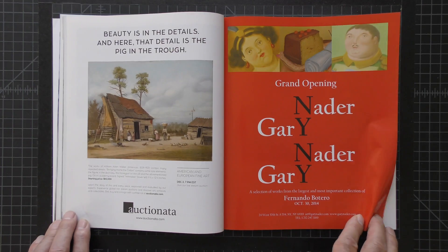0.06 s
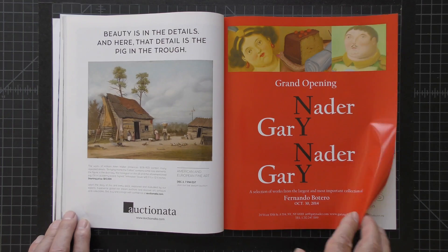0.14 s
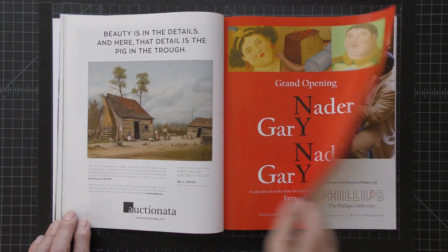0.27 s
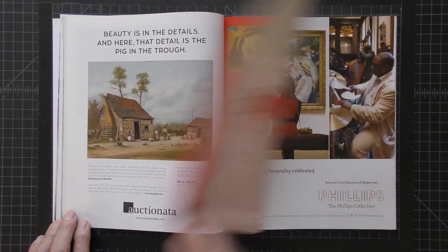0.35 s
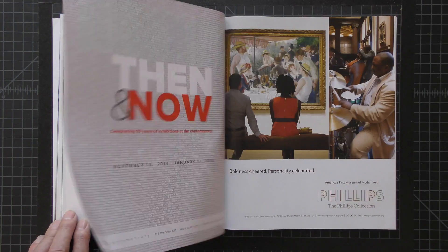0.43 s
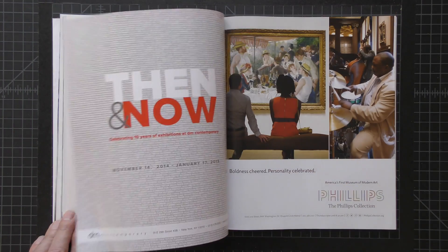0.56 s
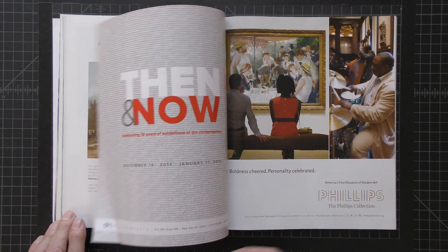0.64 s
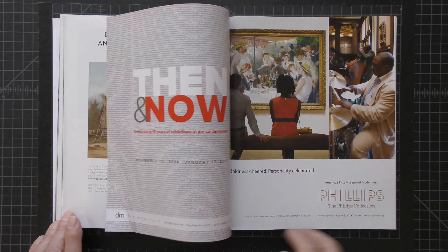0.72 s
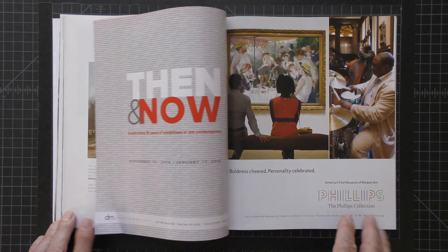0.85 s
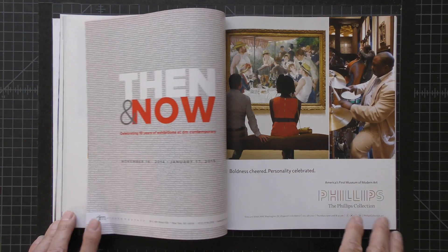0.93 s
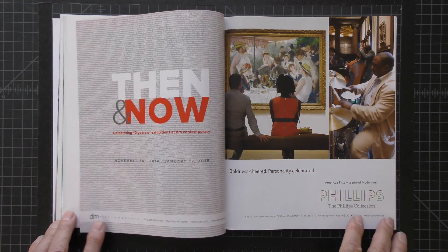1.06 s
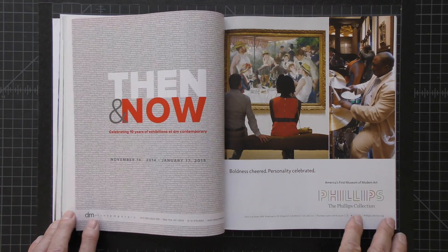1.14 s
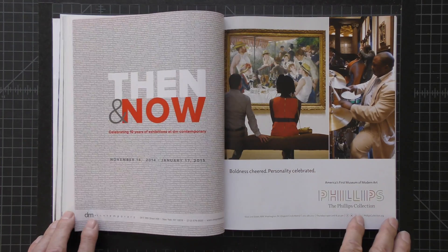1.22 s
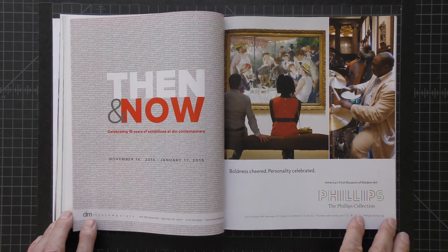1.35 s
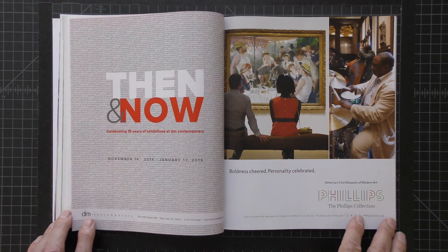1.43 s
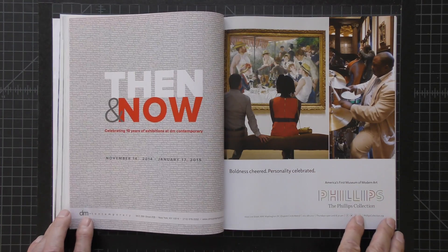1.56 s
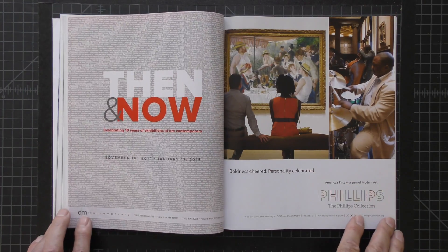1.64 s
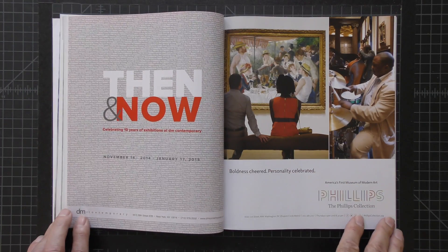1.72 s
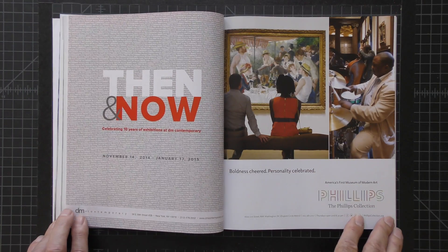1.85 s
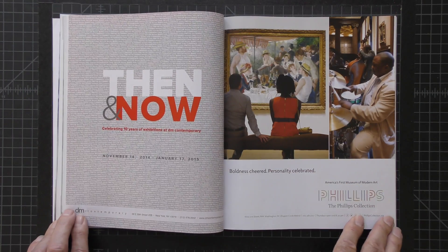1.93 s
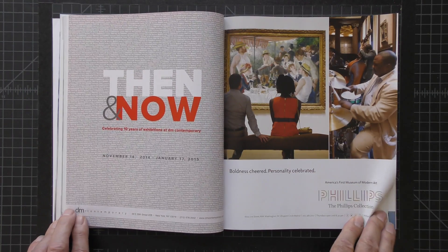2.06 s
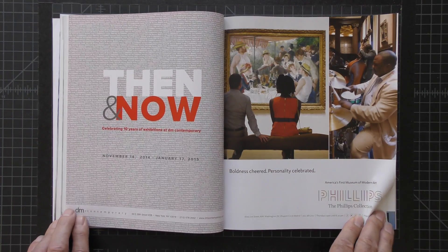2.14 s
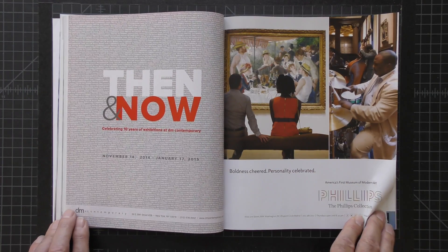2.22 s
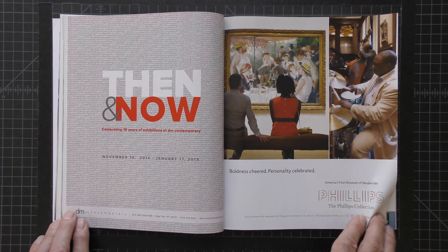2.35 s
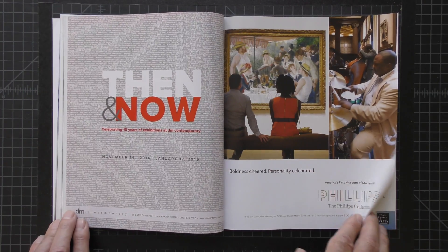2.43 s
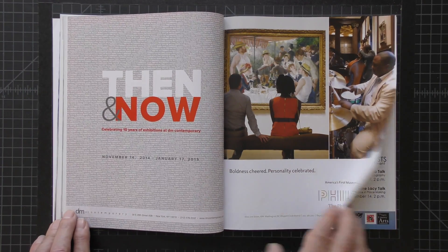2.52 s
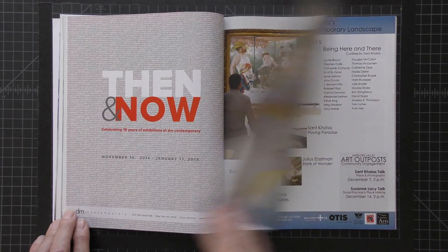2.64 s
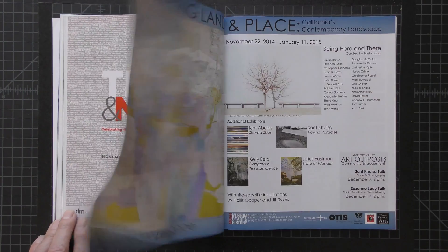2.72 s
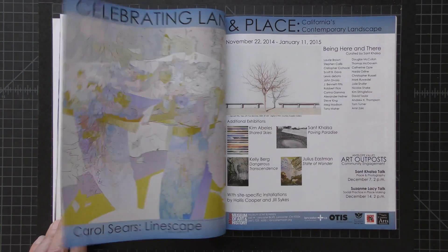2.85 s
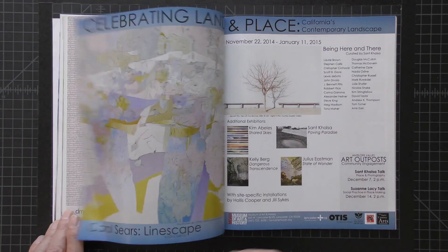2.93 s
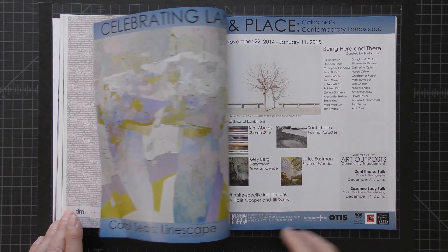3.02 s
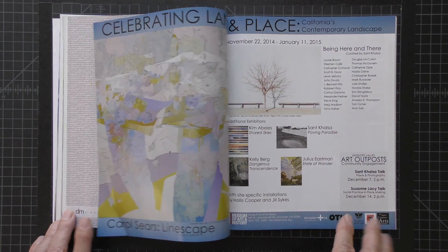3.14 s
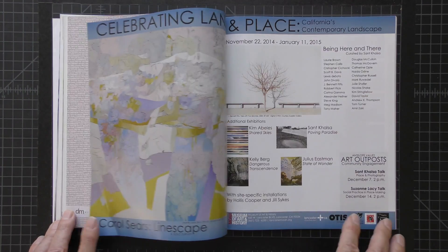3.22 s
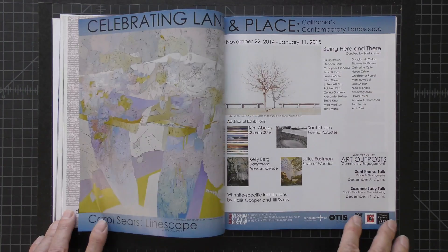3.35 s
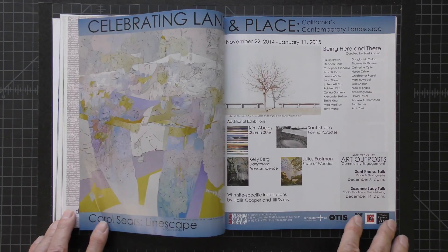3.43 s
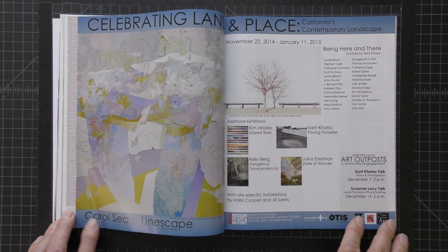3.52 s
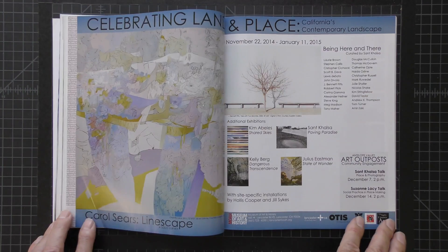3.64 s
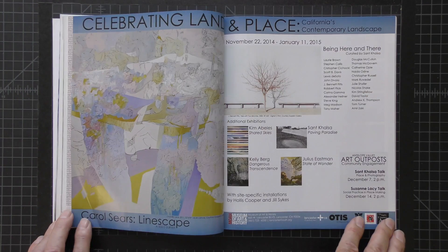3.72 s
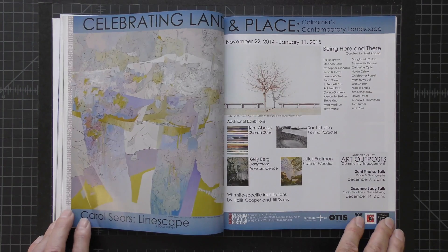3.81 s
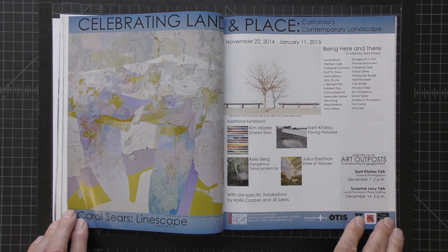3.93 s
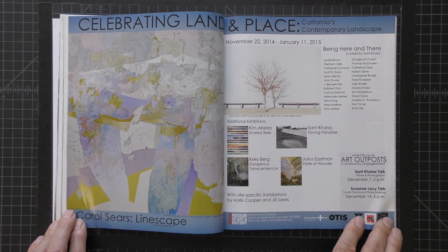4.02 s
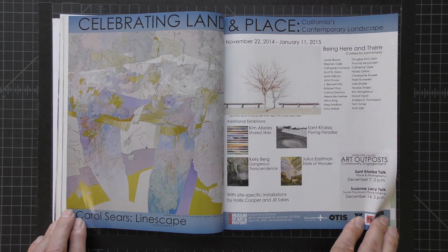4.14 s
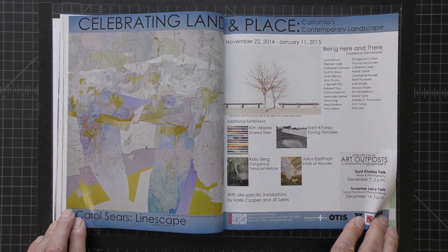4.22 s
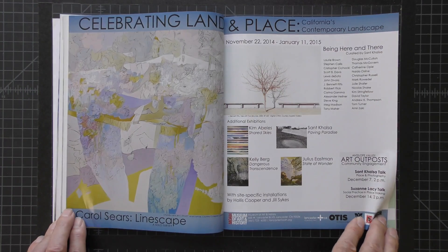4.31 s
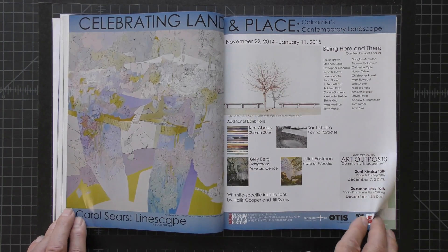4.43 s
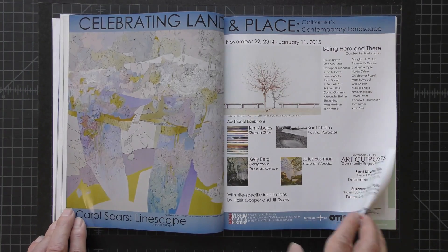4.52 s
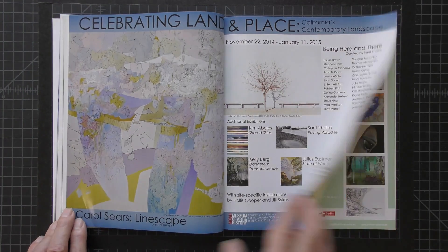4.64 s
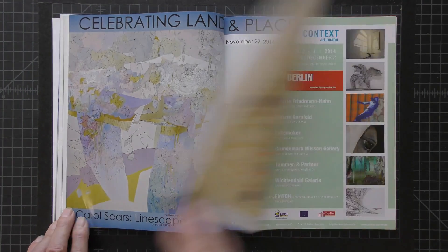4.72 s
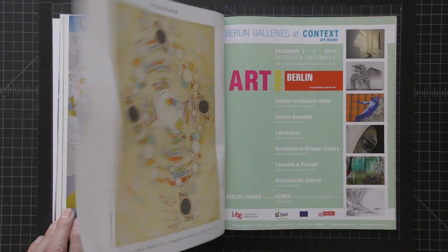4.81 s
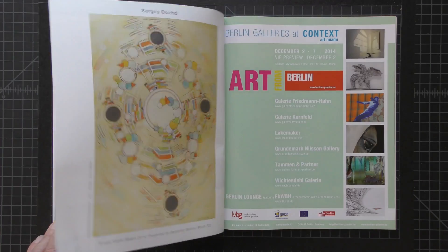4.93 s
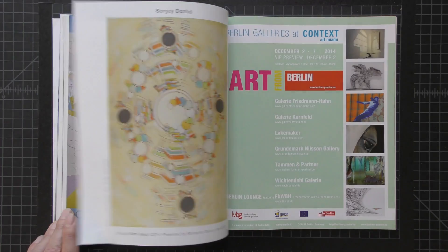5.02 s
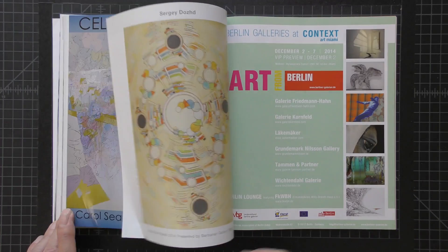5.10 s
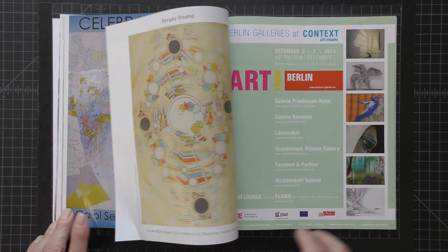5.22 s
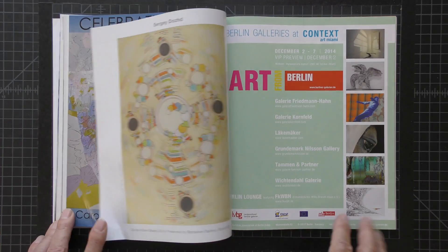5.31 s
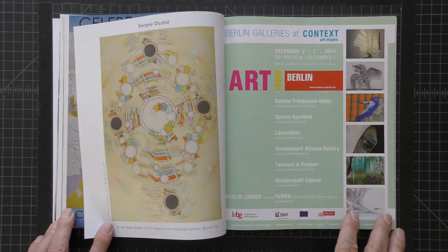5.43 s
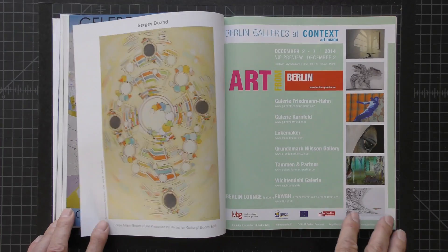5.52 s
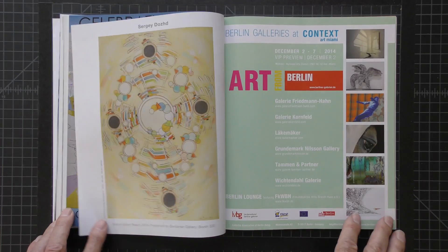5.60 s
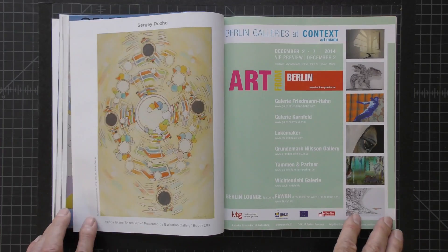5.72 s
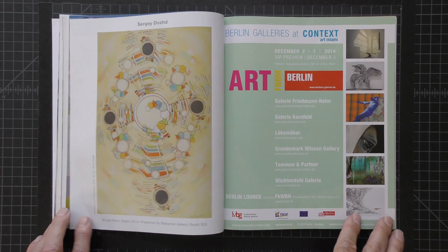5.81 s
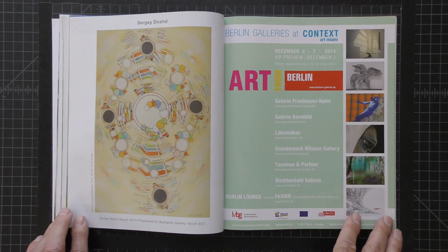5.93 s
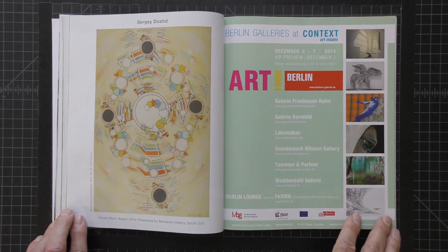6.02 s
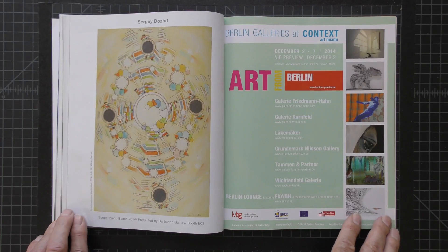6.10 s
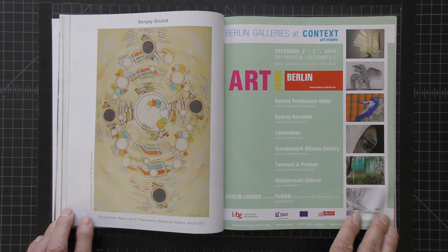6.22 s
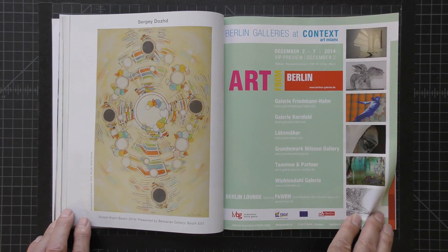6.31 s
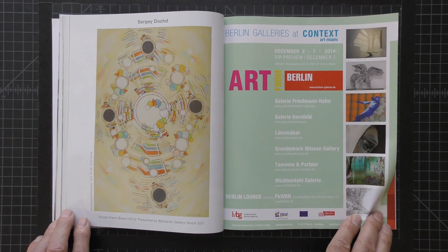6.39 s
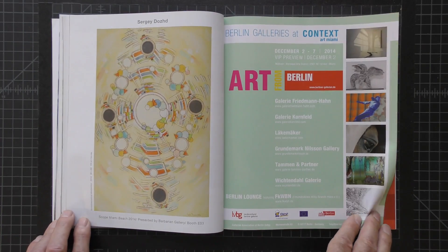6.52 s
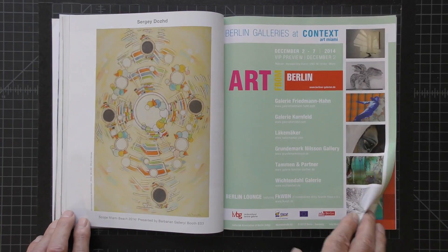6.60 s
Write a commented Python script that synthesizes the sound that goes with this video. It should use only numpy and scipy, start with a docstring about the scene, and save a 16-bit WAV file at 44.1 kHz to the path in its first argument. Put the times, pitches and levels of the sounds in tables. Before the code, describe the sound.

Close by, a hand turns three glossy magazine pages on a table, about two seconds apart. Each sheet snaps as it bends, flaps over, then lands and slides to rest with a thin hiss. Between turns, fingers softly rub the paper and lift a corner with small clicks. Near the end something bumps dully farther off. A faint low hum fills the quiet room.

```python
"""Three glossy magazine pages are turned by hand on a table, in a quiet room with a low hum.
Fingers rub the paper and lift a corner. The sheet snaps as it buckles, flaps over and fans the air,
then lands and slides to rest on the pile. Most paper sounds are showers of tiny clicks, filtered
to ring like the sheet. Near the end something bumps dully farther off."""
import sys
import numpy as np
from scipy import signal
from scipy.fft import rfft, irfft, next_fast_len
from scipy.io import wavfile
from scipy.ndimage import uniform_filter1d

SR = 44100
rng = np.random.default_rng(int(sys.argv[2]) if len(sys.argv) > 2 else 0)


def log_audio(samples):
    """Write samples as a 16-bit WAV file to the path given in sys.argv[1]."""
    # one column per channel
    frames = np.atleast_2d(samples).T
    # limit to full scale, then quantise
    limited = np.clip(frames, -1, 1)
    pcm = np.round(limited * 32767).astype(np.int16)
    wavfile.write(sys.argv[1], SR, pcm)


N = 293706

# the tone of the steady room noise: frequency_hz, level_db
AIR_TONE = [(15, -23), (25, -4), (75, -7), (129, 0), (389, -11.5), (445, -8.5), (631, -41), (684, -20),
            (826, -24.5), (970, -13.5), (1110, -16), (1950, -13.5), (4870, -29), (11500, -30), (15500, -26)]
# the notes of the hum: pitch_hz, width_hz, level_db
HUM_NOTES = [(130.9, 2.9, -65.5), (169, 12, -72.5), (280, 43, -70), (450, 59, -76.5)]
# how alike the room noise is in both ears (1 is the same): frequency_hz, likeness
EAR_LIKENESS = [(30, 0.054), (70, 0.1), (130, 0.59), (300, 0.29), (1000, 0.43), (4000, 0.69), (15000, 0.45)]
# how much louder the noise and hum are on the left: frequency_hz, pan_db
NOISE_PAN = [(30, 4), (125, -2), (300, 0), (1000, 1), (12000, 0)]
# finger strokes on the paper: start_s, length_s, level_db, pitch_hz, fizz_db
FINGER_RUBS = [(0.039, 0.19, -60, 2650, -8.5), (0.229, 0.045, -52.5, 2130, -30),
               (0.326, 0.48, -53, 2110, -11), (1.151, 0.084, -61, 2000, -2),
               (1.295, 0.071, -57, 1820, -10.5), (1.41, 0.24, -60.5, 1910, -12),
               (1.62, 0.083, -56, 2300, -8), (1.708, 0.17, -66.5, 2410, 0), (2.049, 0.077, -54.5, 3740, -1),
               (2.108, 0.25, -63, 2760, -6), (2.387, 0.24, -55, 2380, -10.5), (2.633, .14, -49, 2180, -9),
               (3.558, .11, -57.5, 2330, -7), (3.742, 0.073, -53.5, 2210, -9),
               (3.894, 0.077, -55.5, 2070, -7.5), (4.059, 0.21, -63, 3400, 0),
               (4.273, 0.097, -61.5, 2610, -8), (4.385, 0.22, -62.5, 3400, -10),
               (4.699, 0.2, -59.5, 2100, -15), (4.777, 0.13, -50.5, 2150, -6),
               (5.57, 0.081, -56, 2050, -7.5), (5.678, 0.11, -54.5, 2100, -5.5),
               (5.865, .07, -54, 3030, -4.5), (6.002, .065, -60.5, 3120, 0),
               (6.319, 0.083, -54, 3400, -1.5), (6.384, 0.11, -60.5, 3350, -3),
               (6.506, 0.14, -55, 3160, -11)]
# the tone of the sheet when its pitch is SHEET_HZ: frequency_hz, level_db
SHEET_TONE = [(30, -20), (130, -24.5), (300, -6), (600, -18), (850, -10), (1200, -1.5), (2000, 4.5),
              (3000, -1), (4500, -9.5), (6500, -23), (10000, -33), (16000, -115)]
SHEET_HZ = 2000
# fixed peaks that colour the rustling and sliding paper: pitch_hz, width_hz, boost_db
FIXED_PEAKS = [(740, 23, 4.5), (1090, 170, 5), (1430, 250, 4), (1965, 22, 5), (2310, 190, 1.5),
               (2540, 68, 2.5), (4770, 330, 0)]
# the tone of the cut edge scraping: frequency_hz, level_db
FIZZ_TONE = [(100, -47), (3000, -19.5), (6000, -6.5), (9200, -5.5), (11500, -6.5), (13500, -14.5),
             (16000, -28)]
# where pressed paper rasps: pitch_hz, width_hz, boost_db
RASP_RING = [(5370, 1100, 1)]
# the sheet buckles: start_s, level_db, pitch_hz, crack_db, pan_db
BUCKLES = [(.223, -24, 1700, -38, -1), (.3157, -27.5, 2050, -41, -1), (.4112, -19, 2520, -23, 0),
           (.4643, -10.5, 2900, -17, 5), (.4741, -8.5, 1570, -27, 3.5), (.5022, -13.5, 2300, -21, -2),
           (.5325, -17.5, 2220, -39, 0), (1.568, -30, 2330, -18, 5), (1.5719, -24.5, 3150, -6.5, 2),
           (2.2462, -35.5, 3050, -23, -1), (2.385, -10.5, 2120, -22, -2), (2.5971, -15, 2060, -17.5, 1),
           (2.6048, -19.5, 4770, -14.5, -3.5), (2.6755, -26.5, 3750, -23, 0),
           (2.7308, -15, 2130, -28, -0.5), (2.7507, -4, 2450, -45, -0.5), (2.8482, -14.5, 2370, -53, 2),
           (4.325, -45, 2600, -25, -3), (4.455, -34.5, 3700, -20, -3), (4.6725, -20, 1740, -40, -2),
           (4.7333, -43, 1900, -30, 1), (4.8458, -10, 1920, -28, 6), (4.8622, -16.5, 2400, -15.5, 0),
           (4.9055, -12.5, 2320, -44, 1), (5.0273, -18, 3050, -40, -1), (5.78, -37.5, 3000, -8, 6)]
# fingertips press down to take a corner: start_s, level_db, pitch_hz
FINGER_PRESSES = [(.246, -55, 278), (4.666, -56.5, 190)]
# a page swings over: start_s, length_s, level_db, pitch_hz, bright_db, air_hz, peel_s, slide_db, brush_db
PAGE_TURNS = [(0.462, 0.018, -20, 2050, 7, 714, 0.021, -37, -58),
              (2.748, 0.026, -28, 2070, -7, 340, 0.021, -39.5, -58),
              (4.842, 0.022, -21.5, 2230, 2, 865, .025, -38, -52)]
# the sheet flaps in mid-air or settles: start_s, length_s, level_db, pitch_hz, bright_db
LOOSE_FLAPS = [(0.489, 0.015, -29, 2330, 8.5), (2.784, 0.052, -36.5, 1900, -7),
               (2.845, 0.038, -35.5, 1950, -13), (3.154, .014, -46.5, 1420, -6),
               (4.899, 0.0032, -27, 2420, 2), (4.927, .014, -38, 1880, -7)]
# the tone of one page sliding on another: frequency_hz, level_db
SLIDE_TONE = [(30, -50), (130, -16), (300, -7), (600, -9), (850, -12.5), (1200, -3), (1900, -1.5),
              (3000, -5), (4500, -10), (6500, -20), (10000, -30.5), (16000, -56)]
# the sheet lands on a cushion of air: start_s, length_s, level_db, pitch_hz, fizz_db, cushion_s
PAGE_LANDINGS = [(0.595, 0.053, -36.5, 2025, -34, .012), (3.03, 0.018, -32, 1450, -22.5, .033),
                 (5.026, 0.0088, -30.5, 1560, -32, 0.00397)]
# the tone of a hand brushing over the sheet: frequency_hz, level_db
BRUSH_TONE = [(100, -40), (3000, 0), (5000, -0.5), (7500, -2), (9500, 2.5), (13000, 5.5), (16000, -11)]
# peaks and a dip in that tone: pitch_hz, width_hz, boost_db
BRUSH_RINGS = [(6060, 650, 8.5), (8250, 440, 6.5), (12400, 1000, -6)]
# a dull bump and its rattle: start_s, level_db
BUMP_HITS = [(5.75, -47.5), (5.77, -44), (5.846, -53), (5.892, -56.5), (5.976, -58)]
# where the bumped thing rings: pitch_hz, width_hz, boost_db
BUMP_RINGS = [(382.7, 48, 6.5), (474.5, 75, 8), (676, 66, 1.5), (905, 72, -2)]
# the tone of the bump's tail: frequency_hz, level_db
BUMP_TONE = [(40, -15), (200, -5), (350, -0.5), (500, -3), (700, -3.5), (1200, -6), (2000, -9),
             (3500, -22.5), (8000, -27.5), (16000, -42)]
# how long the room's echo takes to fall by 60 dB: frequency_hz, fade_s
ROOM_FADE = [(150, 0.78), (1000, 0.99), (3000, 0.98), (8000, 0.028), (15000, 0.76)]
# echoes from nearby surfaces: delay_s, level_db
NEAR_ECHOES = [(.0011, -59), (.0076, -21), (.0095, -25), (0.0171, -28), (0.0205, -22)]


def amp(db):
    """Turns decibels into a number to multiply by."""
    return 10 ** (np.asarray(db) / 20)


def unit(x):
    """Scales a sound to an average (rms) level of 1."""
    return x / np.sqrt(np.mean(x ** 2) + 1e-20)


def read(points, hz):
    """Looks up a frequency in a table, blending between its rows."""
    row_hz, value = np.transpose(points)
    return np.interp(np.log(hz + 1), np.log(row_hz + 1), value)


def boosts(rings, hz):
    """The decibels gained or lost near each ringing pitch."""
    return sum(db / (1 + (2 * (hz - pitch) / width) ** 2) for pitch, width, db in rings)


def colour(x, curve):
    """Filters a sound by a curve from Hz to dB, then scales it to level 1."""
    size = next_fast_len(x.shape[-1])
    spectrum = rfft(x, size) * amp(curve(np.fft.rfftfreq(size, 1 / SR)))
    return unit(irfft(spectrum, size)[..., :x.shape[-1]])


def add(mix, start_s, sound, pan_db):
    """Places a sound in the mix; a positive pan_db moves it left."""
    part = mix[:, max(round(start_s * SR), 0):][:, :len(sound)]
    part += amp([[pan_db / 2], [-pan_db / 2]]) * sound[:part.shape[1]]


def treble(hz, knee_hz=2300, full_hz=5500):
    """How strongly brightness acts: 0 below knee_hz, 1 at full_hz, up to 1.4 above."""
    return np.clip(np.log((hz + 1) / knee_hz) / np.log(full_hz / knee_hz), 0, 1.4)


def room_hum(air_db=-59.5, low_cut_hz=36, hum_likeness=0.41):
    """Steady room noise and a hum; each hum note is a narrow band of noise, so it wavers."""
    hz = np.fft.rfftfreq(N, 1 / SR)

    def noise_pair(likeness):
        """Left and right noise that are partly alike."""
        shared, separate = rfft(rng.standard_normal((2, N)))
        lean = amp(read(NOISE_PAN, hz) / 2)
        right = likeness * shared + np.sqrt(1 - likeness ** 2) * separate
        return irfft([shared * lean, right / lean], N)
    air_tone = lambda f: read(AIR_TONE, f) - 10 * np.log10(1 + (low_cut_hz / (f + 1)) ** 4)
    out = amp(air_db) * colour(noise_pair(read(EAR_LIKENESS, hz)), air_tone)
    noise = noise_pair(hum_likeness)
    for pitch, width, db in HUM_NOTES:
        out += amp(db) * colour(noise, lambda f: -20 * np.log10(1 + ((f - pitch) / width) ** 2))
    return out


def slips(n, per_s, spread_db):
    """Paper sticks and slips, making tiny clicks of uneven size."""
    chance, size = rng.random(n), np.minimum(rng.exponential(1, n), 3)
    return unit(rng.choice([-1, 1], n) * amp(spread_db * size) * (chance < per_s / SR))


def paper(clicks, pitch_hz, bright_db):
    """Clicks ring the sheet; a tighter bend rings higher."""
    tone = lambda hz: read(SHEET_TONE, hz * SHEET_HZ / pitch_hz) + boosts(FIXED_PEAKS, hz)
    return colour(clicks, lambda hz: tone(hz) + bright_db * treble(hz))


def fizz(n):
    """The cut edge scrapes over the glossy coating."""
    return colour(slips(n, per_s=9000, spread_db=4), lambda hz: read(FIZZ_TONE, hz))


def flex(x, patchy_db):
    """A bending sheet keeps changing where it rings, so its tone drifts."""
    bands = signal.stft(x, SR, nperseg=256)[2]
    patches = uniform_filter1d(rng.standard_normal(bands.shape), size=3, axis=0)  # smooth over pitch
    patches = uniform_filter1d(patches, size=12, axis=1)  # and over time
    return unit(signal.istft(bands * amp(patchy_db * unit(patches)), nperseg=256)[1][:len(x)])


def finger_rubs(skew=0.69, fullness=0.65):
    """Light strokes swell and fade, rasping on the pressed paper."""
    out = np.zeros((2, N))
    for start, length, db, hz, fizz_db in FINGER_RUBS:
        n = round(length * SR)
        swell = abs(np.sin(np.pi * np.linspace(0, 1, n) ** skew)) ** fullness
        clicks = slips(SR // 2, per_s=6000, spread_db=5)
        rub = paper(clicks, hz, bright_db=0.5) + amp(fizz_db) * fizz(SR // 2)
        rasp = colour(rub, lambda f: boosts(RASP_RING, f))
        add(out, start, amp(db) * swell * flex(rasp, patchy_db=3)[:n], pan_db=-0.5)
    return out


def flap(length_s, hz, bright_db, fizz_db, attack_s=0.002, release_s=0.0065):
    """A rush of small buckles runs through the sheet and dies quickly."""
    t = np.arange(4096) / SR
    shape = np.minimum(t / attack_s, 1) * np.exp(-np.maximum(t - length_s, 0) / release_s)
    clicks = slips(len(t), per_s=3500, spread_db=2)
    rustle = paper(clicks, hz, bright_db) + amp(fizz_db) * fizz(len(t))
    return unit(rustle * shape) * np.sqrt(np.mean(shape ** 2))


def buckle_snaps(ring_cycles=1.05, glide=0.16, rise_ms=0.13, strain_ms=0.58, crack_ms=0.98,
                 crinkle_ms=3.14, crinkle_db=-12, shiver_s=0.024, shiver_db=-31.5):
    """Each buckle is a short pulse; the coating cracks with it, then the sheet crinkles and shivers."""
    out, lead = np.zeros((2, N)), 128  # the crack starts this many samples early
    t = (np.arange(2048) - lead) / SR
    after_ms, before_ms = 1000 * np.maximum(t, 0), 1000 * np.maximum(-t, 0)
    # a thin sheet gives off little bass, and its fold is too soft for the highest treble
    cut_bass, cut_treble = signal.butter(2, 620, "high", fs=SR), signal.butter(3, 5600, fs=SR)
    for start, db, hz, crack_db, pan_db in BUCKLES:
        age = np.maximum(t, 0) * hz / ring_cycles
        # short bending waves travel fastest, so the pitch falls through the pulse
        falling_hz = hz * np.exp(glide * (1 - np.minimum(age, 3)))
        phase = 2 * np.pi * np.cumsum(falling_hz * (t > 0)) / SR
        pulse = np.sin(phase) * np.exp(-age) * (1 - np.exp(-after_ms / rise_ms))
        crinkle = amp(crinkle_db) * paper(rng.standard_normal(len(t)), hz, bright_db=0.91)
        crinkle *= np.exp(-after_ms / crinkle_ms) * (t > 0)
        crack = amp(crack_db) * fizz(len(t)) * np.exp(-after_ms / crack_ms - before_ms / strain_ms)
        body = signal.lfilter(*cut_treble, signal.lfilter(*cut_bass, pulse) + crinkle)
        add(out, start - lead / SR, amp(db) * (body + crack), pan_db)
        shiver = flap(shiver_s, hz, bright_db=4, fizz_db=crack_db + 5)
        add(out, start, amp(db + shiver_db) * shiver, pan_db)
    return out


def puff(length_s, pitch_hz, sharpness=3.3):
    """The broad sheet pushes air: a soft low flutter."""
    n = round(length_s * SR)
    band = lambda hz: -10 * np.log10(1 + (sharpness * np.log((hz + 1) / pitch_hz)) ** 4)
    return unit(colour(rng.standard_normal(SR // 4), band)[:n] * np.hanning(n))


def finger_presses(length_s=0.029):
    """A fingertip presses the air out from between the pages."""
    out = np.zeros((2, N))
    for start, db, hz in FINGER_PRESSES:
        add(out, start, amp(db) * puff(length_s, hz), pan_db=1)
    return out


def page_swings(peel_db=-33, air_db=-19.5, air_s=0.024, pan_db=1.1):
    """Each page peels off the one below with a hiss, then whips over and fans the air."""
    out = np.zeros((2, N))
    for start, length, db, hz, bright_db, air_hz, peel_s, _, _ in PAGE_TURNS:
        peel = flap(peel_s, hz=1880, bright_db=0, fizz_db=-12, attack_s=0.0085)
        add(out, start - peel_s, amp(peel_db) * peel, pan_db=2.5)
        add(out, start, amp(db) * flap(length, hz, bright_db, fizz_db=-30), pan_db)
        add(out, start, amp(db + air_db) * puff(air_s, air_hz), pan_db)
    return out


def loose_flaps():
    """The loose sheet flaps again after its swing."""
    out = np.zeros((2, N))
    for start, length, db, hz, bright_db in LOOSE_FLAPS:
        add(out, start, amp(db) * flap(length, hz, bright_db, fizz_db=-32), pan_db=2)
    return out


def page_slides(delay_s=0.04, length_s=0.745, fade_db_per_s=33.5, dull_db_per_s=9, treble_db=0.5,
                judder_db=0.64, judder_hz=110):
    """The sheet drags over the page below, juddering, fading and dulling as it slows."""
    out, t = np.zeros((2, N)), np.arange(0, length_s, 1 / SR)
    soft_ends = signal.windows.tukey(len(t), 0.06)
    for start, _, _, _, bright_db, _, _, slide_db, _ in PAGE_TURNS:
        clicks = slips(SR, per_s=7000, spread_db=3)
        drag = colour(clicks, lambda hz: read(SLIDE_TONE, hz) + boosts(FIXED_PEAKS, hz))
        band_hz, age_s, bands = signal.stft(flex(drag, patchy_db=2.14), SR, nperseg=256)
        bands *= amp(treble(band_hz)[:, None] * (bright_db + treble_db - dull_db_per_s * age_s))
        fading = signal.istft(bands, nperseg=256)[1][:len(t)] * amp(slide_db - fade_db_per_s * t)
        judder = colour(rng.standard_normal(SR), lambda hz: -20 * np.log10(1 + (hz / judder_hz) ** 2))
        add(out, start + delay_s, fading * amp(judder_db * judder[:len(t)]) * soft_ends, pan_db=0.6)
    return out


def page_landings(cushion_db=-9.5, linger_s=0.0087, thud_db=-22.5, thud_s=0.059, pan_db=3):
    """Air is squeezed out from under the falling sheet, which then slaps the pile."""
    out = np.zeros((2, N))
    for start, length, db, hz, fizz_db, cushion_s in PAGE_LANDINGS:
        cushion = puff(cushion_s + length + linger_s, pitch_hz=1100)
        thud = puff(cushion_s + thud_s, pitch_hz=320)
        slap = flap(length, hz, bright_db=5, fizz_db=fizz_db)
        add(out, start - cushion_s, amp(db + cushion_db) * cushion, pan_db)
        add(out, start - cushion_s, amp(db + thud_db) * thud, pan_db)
        add(out, start, amp(db) * slap, pan_db)
    return out


def hand_brushes(peak_after_s=0.52, width_s=0.12):
    """A thin hiss swells and fades on both sides as a hand brushes over the sheet."""
    out, t = np.zeros((2, N)), np.arange(SR) / SR
    swell = np.exp(-((t - peak_after_s) / width_s) ** 2)
    tone = lambda hz: read(BRUSH_TONE, hz) + boosts(BRUSH_RINGS, hz)
    for start, *_, brush_db in PAGE_TURNS:
        for pan_db in (-9, 9):
            hiss = colour(rng.standard_normal(SR), tone)
            add(out, start, hiss * amp(brush_db) * swell / 2, pan_db)
    return out


def far_bump(attack_s=0.0037, knock_db=1, knock_fade_s=0.21, tail_db=-2, tail_fade_s=1.0):
    """Far blows on something hollow: a firm knock, then the room smears it."""
    out, t = np.zeros((2, N)), np.arange(SR) / SR
    tone = lambda hz: read(BUMP_TONE, hz) + boosts(BUMP_RINGS, hz)
    for start, db in BUMP_HITS:
        ring = sum(amp(boost) * np.sin(2 * np.pi * (hz * t + rng.random()))
                   for hz, _, boost in BUMP_RINGS)
        knock = unit(ring) * amp(knock_db - 60 * t / knock_fade_s)
        tail = colour(rng.standard_normal(SR), tone) * amp(tail_db - 60 * t / tail_fade_s)
        add(out, start, amp(db) * np.minimum(t / attack_s, 1) * (knock + tail), pan_db=0.8)
    return out


def room_echo(x, tail_db=-15, tail_delay_s=0.007, scatter_db=-17, scatter_s=0.0038):
    """Adds single echoes, a quick scatter from things on the table, and a faint tail."""
    t = np.arange(SR // 2) / SR
    noise = rng.standard_normal((2, len(t))) * (t > tail_delay_s)
    hz, age_s, bands = signal.stft(noise, SR, nperseg=256)
    bands *= amp(-60 * age_s / read(ROOM_FADE, hz)[:, None])
    tail = signal.istft(bands, nperseg=256)[1][:, :len(t)]
    scatter = rng.standard_normal((2, len(t))) * np.exp(-t / scatter_s)
    response = (amp(tail_db) * unit(tail) + amp(scatter_db) * unit(scatter)) / np.sqrt(len(t))
    response[:, 0] += 1  # the direct sound
    for delay, db in NEAR_ECHOES:
        response[:, round(delay * SR)] += amp(db)
    return signal.fftconvolve(x, response, axes=1)[:, :N]


def scene():
    """The paper sounds and the bump echo in the room, over its hum."""
    fingers = finger_rubs() + finger_presses()
    turning = buckle_snaps() + page_swings() + loose_flaps()
    settling = page_landings() + page_slides() + hand_brushes()
    return room_echo(fingers + turning + settling + far_bump()) + room_hum()


def record(dry):
    """Cuts away the very highest treble, above 15900 Hz."""
    low_pass = signal.firwin(511, 15900, window=("kaiser", 9), fs=SR)
    return signal.oaconvolve(dry, low_pass[None], "same")


dry = scene()
out = record(dry)
log_audio(out)
```